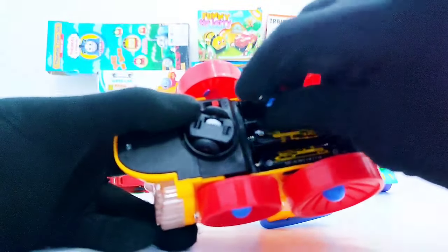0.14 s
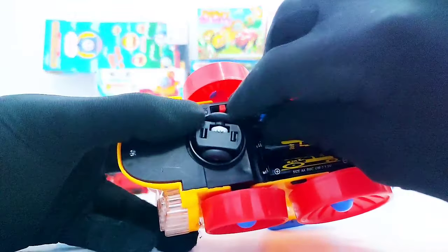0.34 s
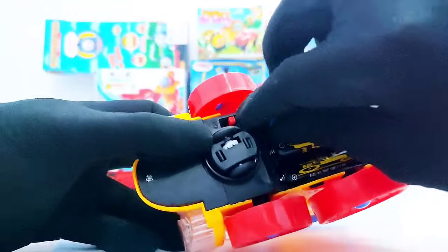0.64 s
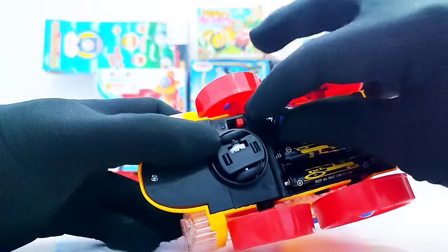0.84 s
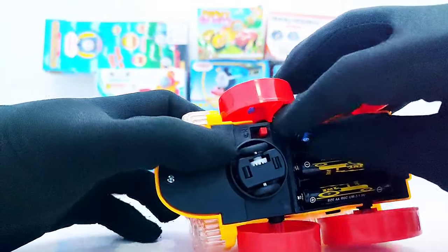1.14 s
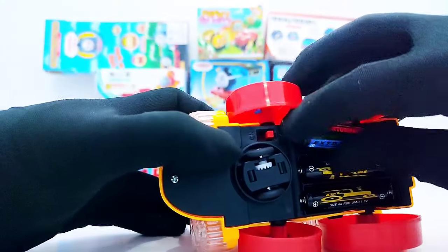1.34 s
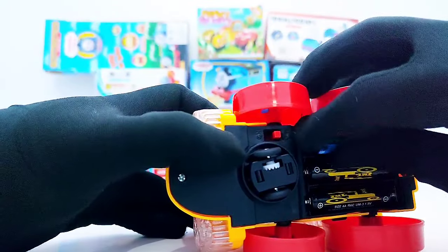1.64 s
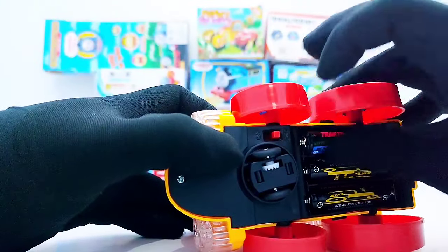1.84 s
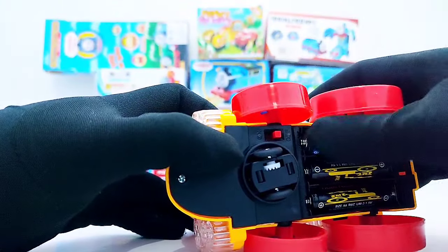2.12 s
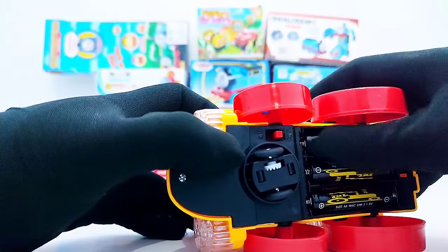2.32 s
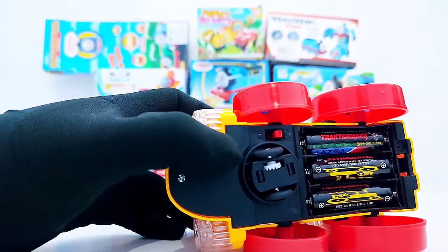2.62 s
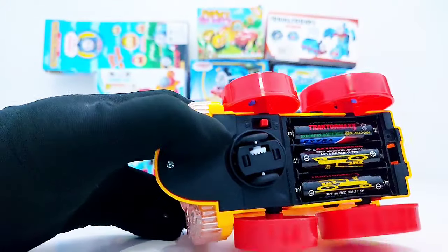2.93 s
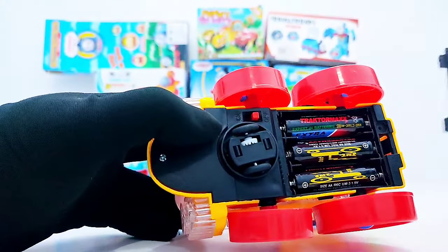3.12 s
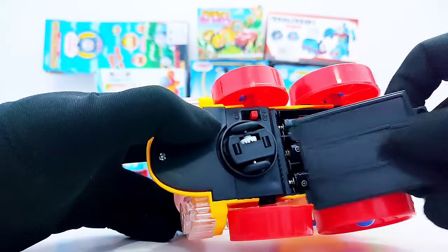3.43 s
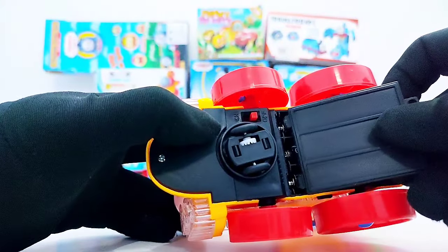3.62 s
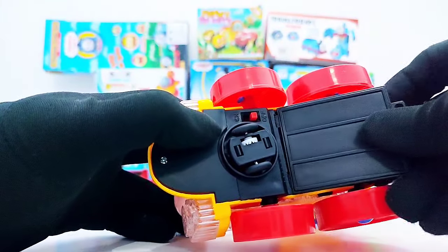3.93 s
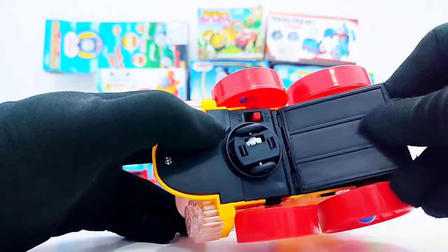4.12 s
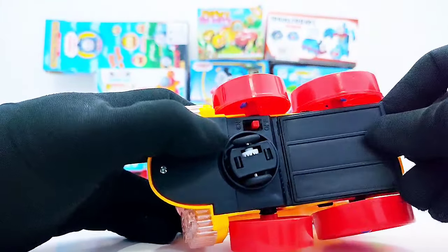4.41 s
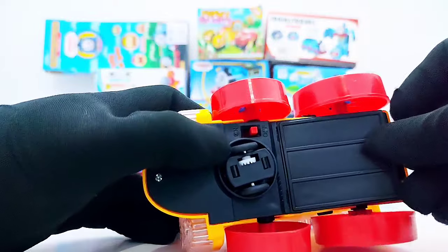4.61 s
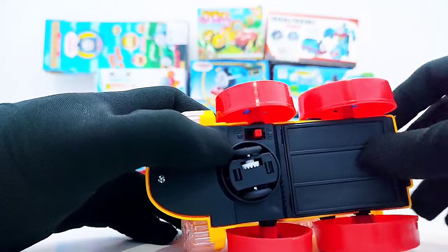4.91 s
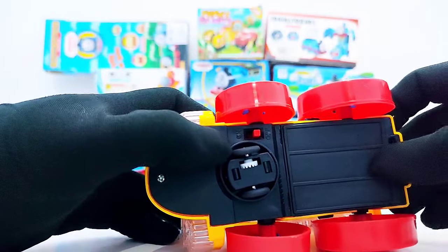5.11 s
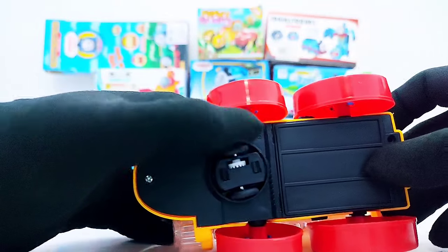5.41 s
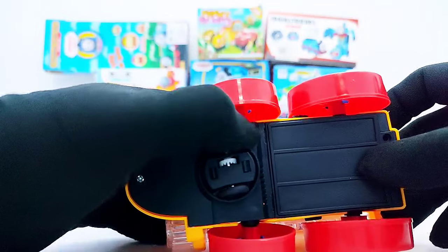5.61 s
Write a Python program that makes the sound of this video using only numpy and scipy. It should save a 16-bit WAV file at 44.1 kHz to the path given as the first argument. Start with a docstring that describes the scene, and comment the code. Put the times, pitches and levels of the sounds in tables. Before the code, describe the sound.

A close, dry stereo pickup of a hollow plastic toy handled by gloved hands in a small room, over faint room air and a low steady mains hum. A soft low bump and a light click open it; at 0.7 s a tight cluster of clacks knocks the shell, with a slight table boom and rattle. Quiet glove rubbing follows, then moderate clicks at 1.6-1.9 s. Around 2.2 s ticks build to the hardest battery snap at 2.27 s, bright and hollow, with a short boom and loose rattle. Smaller clicks follow at 2.5 and 2.8 s. It calms until the cover touches lightly at 3.5 s; dull hand bumps rumble, mostly on the right, around 3.7-4.1 s. A brief gritty scrape comes at 4.15 s, a click at 4.3, small ticks from 4.7, then a loud latch snap, brighter on the left, at 5.15 s. A faint tick, pat and soft thumb rub end it.

```python
"""Closing a toy train's battery cover

Gloved hands press a battery into a hollow plastic toy train, then slide its cover on and snap it shut.
Each contact scuffs and briefly rings the shell; fingertips pat it, and the latch rings the cover.
Gloves, cover and thumb rub as grainy noise; hard pushes boom the table and set loose parts rattling.
Hands bump and rumble the microphone. A small room answers the plastic, over room air and a mains hum."""
import sys
import numpy as np
from scipy import signal
from scipy.fft import rfft, irfft, next_fast_len
from scipy.io import wavfile
from scipy.ndimage import uniform_filter1d

SR = 44100
rng = np.random.default_rng(int(sys.argv[2]) if len(sys.argv) > 2 else 0)


def wrap_up_sound(samples):
    """Save the sound to the file named by the first command line argument, as 16-bit audio."""
    columns = np.atleast_2d(samples).T
    # keep every value between -1 and 1, then stretch to whole-number steps
    tamed = np.clip(columns, -1, 1)
    steps = np.round(tamed * 32767).astype(np.int16)
    wavfile.write(sys.argv[1], SR, steps)


N = 253737
TIME = np.arange(N) / SR

# plastic contacts, from battery to cover: (time [s], level [dB], pitch the struck spot favours [Hz],
# hardness [dB per octave], treble left over right [dB], held within 10 either way)
CLICKS = [(.2153, -37, 2220, -1, -7), (0.7192, -30, 920, 2.5, 10), (0.7218, -23.3, 1540, -3, -13),
          (.731, -32.5, 2090, -2.5, -13), (.743, -41.5, 1400, -2, -6), (0.9213, -44, 4060, -2, 0),
          (1.479, -53, 900, 3.5, 0), (1.507, -54, 800, 3, 0), (1.6038, -30.5, 2050, 1, 0),
          (1.621, -35.5, 1700, -3, -8), (1.6489, -31, 1650, 0, -4), (1.7609, -26.5, 1400, 3.5, 0),
          (1.8888, -34.5, 980, -1, 2), (2.04, -47.5, 895, 4, 0), (2.136, -42.5, 1610, -6.5, 0),
          (2.1877, -40.5, 1900, -2.5, -6), (2.209, -44, 3200, 0, 5), (2.2465, -38.5, 1690, -8.5, 10),
          (2.271, -22.5, 900, 3, -7.5), (2.2728, -12, 1200, 2.2, -5), (2.442, -41.5, 1280, 0.5, -3),
          (2.4765, -33, 960, -1, -10), (2.48, -38.5, 3200, 4, 1), (2.516, -32, 1020, 0.5, -5),
          (2.789, -50, 3200, 5, -11), (2.8095, -34, 4360, 1.5, -14), (2.822, -42.5, 2825, 8.5, -14),
          (3.5383, -37, 1390, -3, 1), (3.5439, -36.5, 1340, -4, 12), (3.638, -48, 900, -0.5, -2),
          (3.8088, -47.5, 823, -4.5, 4), (3.984, -56.5, 1820, 5.5, -3.5), (4.3237, -31, 1620, -2, 0),
          (4.7042, -38, 900, -1, -1.5), (4.708, -33, 4340, -1.2, 0.5), (4.725, -41, 1680, -0.5, -3),
          (4.829, -49, 700, 3.5, -8), (4.905, -43, 2040, 0, -1), (4.92, -41, 960, -8, 4.5),
          (5.027, -47, 810, 1.5, -1), (5.076, -45, 2300, -3, -1), (5.151, -28, 1750, -1.5, 8),
          (5.428, -46, 2460, -3.5, 3)]
# gloved fingertips patting the shell as they find their hold: (time [s], level [dB])
PATS = [(.077, -50.5), (1.149, -52), (1.3283, -48), (3.451, -52), (4.446, -51), (4.758, -49),
        (5.5592, -48.5)]
# the toy's weight landing on the table: (time [s], level [dB])
KNOCKS = [(0.722, -21.5), (2.274, -29), (2.808, -28.5)]
# edges of the shell's hollow, knock, clack, snap and tick registers: (frequency [Hz])
REGISTER_HZ = [450, 750, 1150, 1800, 3200, 14000]

FAVOUR_DB, FAVOUR_OCTAVES = 11.5, 0.41  # how much, and how widely, the struck spot lifts its own pitch
CHATTER_S = .001  # time constant of a contact's chatter
LEAD_S = .005  # quiet ahead of each contact
CONTACT_TIME = np.arange(2048) / SR - LEAD_S
CONTACT_HZ = np.fft.rfftfreq(len(CONTACT_TIME), 1 / SR)
HISS_TOP_HZ = 14400  # upper edge of rubbing, rumble and room air
RELEASE_S = .07  # time for a rub to fall 60 dB once the hand lets go


def amp(db):
    """Turns decibels into gain."""
    return 10 ** (np.asarray(db) / 20)


def evened(x):
    """Scales to an rms of one."""
    return x / np.sqrt(np.mean(x ** 2) + 1e-20)


def read(points, hz, column=1):
    """Reads between a table's points on a log-frequency axis."""
    columns = np.transpose(points)
    return np.interp(np.log(hz + 1), np.log(columns[0] + 1), columns[column])


def sides(db):
    """Left and right gains for a level difference; a negative one favours the right."""
    return evened(amp([[db / 2], [-db / 2]]))


def add(mix, s, sound):
    """Mixes a sound in at time s, cutting it off at the end."""
    part = mix[:, max(round(s * SR), 0):][:, :sound.shape[1]]
    part += sound[:, :part.shape[1]]


def colour(x, tone):
    """Gives a sound a spectrum, at an rms of one."""
    size = next_fast_len(N)
    hz = np.fft.rfftfreq(size, 1 / SR)
    gain = amp(read(tone, hz)) * (hz < HISS_TOP_HZ)
    return evened(irfft(rfft(x, size) * gain, size)[..., :N])


def noise(size, alike):
    """Two channels of white noise that are partly the same."""
    left, other = rng.standard_normal((2, size))
    alike = np.clip(alike, 0, 1)
    return np.array([left, alike * left + np.sqrt(1 - alike ** 2) * other])


def background():
    """Still room air as shaped noise, and the mains hum as one sine."""
    # room air: (frequency [Hz], relative level per Hz [dB])
    air_tone = [(130, -6), (220, -10), (380, -6), (1200, -21), (2400, -31.5), (8000, -46.5), (14000, -38)]
    hum_hz, hum_db = 100.4, -48.5  # dB rms
    hum = amp(hum_db) * np.sqrt(2) * np.sin(2 * np.pi * hum_hz * TIME)
    return hum + amp(-56.0) * colour(noise(N, 0.85), air_tone)


def handling(bump_cycles=0.24):
    """Dead bumps of the moving hands and the low rumble that grows around them, mostly on the right."""
    # soft bumps of the hands: (time [s], peak level before panning [dB], pitch [Hz])
    hand_bumps = [(0.072, -19.5, 64.4), (1.258, -23, 53), (1.708, -20.5, 71), (2.654, -26.5, 52),
                  (3.681, -20, 66.5), (3.731, -27, 146), (3.836, -21.5, 45.7), (4.133, -26, 57.8)]
    # rumble: (frequency [Hz], relative level per Hz [dB])
    rumble_tone = [(60, 6), (160, -15), (4000, -80)]
    # rumble at rest; added rumble against each bump; its time constant before and after the bump
    steady_db, unrest_db, unrest_s = -48.5, -15, 0.23
    unrest = 0
    for s, db, hz in hand_bumps:
        fade_db = 20 * np.log10(np.e) * abs(TIME - s) / unrest_s
        unrest = unrest + amp(db + unrest_db - fade_db) ** 2
    rumble = colour(noise(N, 0.47), rumble_tone)
    out = rumble * np.sqrt(amp(steady_db) ** 2 + unrest) * sides(-7.0)
    t = np.arange(SR // 4) / SR
    for s, db, hz in hand_bumps:
        swell = hz * t / bump_cycles
        envelope = swell ** 2 * np.exp(2 - 2 * swell)  # peaks at one when swell is one
        add(out, s, amp(db) * envelope * np.sin(2 * np.pi * hz * t) * sides(-34.0))
    return out


def rub(gain, tone, slip_db, slips_per_s=300, grain_db=2.2, flutter_db=3.0):
    """Friction: a fine hiss with many tiny slips of uneven size, catching and letting go."""
    slip_starts = rng.random(N) < slips_per_s / SR
    slip_size = amp(grain_db * np.minimum(rng.exponential(1, N), 4))
    slips = slip_starts * slip_size * noise(N, 0.17)
    # smoothed noise makes the level wander
    catch = evened(uniform_filter1d(uniform_filter1d(rng.standard_normal(N), size=500), size=500))
    grit = noise(N, 0.06) + amp(slip_db) * evened(slips)
    return colour(grit, tone) * gain * amp(flutter_db * catch)


def stroke(rows, swell_db):
    """Gain of a series of rubs: each swells while the hand pushes and dies when it lets go."""
    gain = np.zeros(N)
    for start, length, db in rows:
        progress = np.clip((TIME - start) / length, 0, 1)
        released_s = np.maximum(TIME - start - length, 0)
        gain += progress * amp(db - swell_db * (1 - progress) ** 2 - 60 * released_s / RELEASE_S)
    return gain


def gloves():
    """Gloves stroke the plastic as grainy noise, over a faint rustle while they only hold the toy."""
    # strokes: (start [s], length [s], level at the end of the push [dB])
    glove_strokes = [(.65, 0.044, -48.5), (1.17, .25, -61), (1.62, .6, -57), (2.35, .24, -49.5),
                     (2.76, 0.19, -50.5), (4.125, 0.042, -45), (4.72, 0.38, -55.5)]
    # rubbing gloves: (frequency [Hz], relative level per Hz [dB])
    glove_tone = [(300, -1), (1000, 2.5), (2500, -3.5), (5300, -8), (7300, -7), (9500, -16.5),
                  (12500, -12.5)]
    grip_db = -64.5
    gain = amp(grip_db) + stroke(glove_strokes, swell_db=0)
    return rub(gain, glove_tone, slips_per_s=95, slip_db=-10.5) * sides(-1.8)


def scuffs():
    """Parts scrape along each other just before and after they touch: brief gritty friction."""
    # scuffing plastic: (frequency [Hz], relative level per Hz [dB])
    scuff_tone = [(400, -3), (1000, 4), (2200, -1.5), (4000, -10.5), (15000, -32)]
    # level against the contact; the highest level set; time to fall 60 dB either side
    scuff_db, max_db, scuff_s = -6, -48, 0.047
    coarse_time = TIME[::64]
    gain = 0
    for s, db, *_ in CLICKS + PATS:
        gain = gain + amp(min(db + scuff_db, max_db) - 60 * abs(coarse_time - s) / scuff_s)
    gain = np.interp(TIME, coarse_time, gain)
    return rub(gain, scuff_tone, slips_per_s=830, slip_db=7.5) * sides(-2)


def registers(db, spot_hz, hardness_db):
    """Shares a level among the shell's registers: harder is brighter, and the spot favours one pitch."""
    edges = np.log2(REGISTER_HZ)
    octaves = (edges[1:] + edges[:-1]) / 2 - np.log2(spot_hz)
    shape_db = hardness_db * octaves + FAVOUR_DB * np.exp(-(octaves / FAVOUR_OCTAVES) ** 2 / 2)
    return db + shape_db - 20 * np.log10(np.linalg.norm(amp(shape_db)))


def causal(gain):
    """Gives a gain curve the phase of a real resonator, so that nothing sounds before the blow."""
    cepstrum = irfft(np.log(gain + 1e-9))
    size = cepstrum.shape[-1]
    # move the half that lies before time zero to after it
    fold = 1 + np.sign(size / 2 - np.arange(size)) * (np.arange(size) > 0)
    return np.exp(rfft(cepstrum * fold))


def ten_ms_db(z):
    """Level of a contact's spectrum, as if it lasted ten milliseconds."""
    return 10 * np.log10(np.sum(abs(z) ** 2) / len(CONTACT_TIME) / (SR / 100))


def struck(modes, detune, neighbour_sign, crack=0, channel_spread=1.2):
    """Two-channel spectrum of a struck plastic part: a short burst of chatter rings its modes."""
    t, hz = CONTACT_TIME, CONTACT_HZ
    # the surfaces touch many times in quick succession, which drives the modes
    chatter = rfft(rng.standard_normal(len(t)) * np.exp(-abs(t) / CHATTER_S) * (t > 0))
    chatter = chatter / causal(abs(chatter) ** .75)  # drives the modes more evenly
    body = crack * np.ones((2, len(hz)), complex)
    for k, (mode_hz, db, t60) in enumerate(modes):
        # the grip can shift each mode a little, and high modes reach the two channels out of step
        offset_hz = hz - mode_hz * (1 + detune * rng.standard_normal())
        turn = channel_spread * np.tanh(mode_hz / 3500) * rng.standard_normal() * np.array([[.5], [-.5]])
        resonance = 1 / (1 + 2j * np.pi * offset_hz * t60 / np.log(1000))
        body += neighbour_sign ** k * amp(db) * np.exp(1j * turn) * resonance
    # a small part radiates little below its first mode, and soft plastic little in the top treble
    below = REGISTER_HZ[0] / (1j * hz + 1)
    low_cut = (1 + below + below ** 2) * (1 + below)
    return chatter * body / low_cut / (1 + (hz / REGISTER_HZ[-1]) ** 20)


def radiate(z, treble_db, lag_s=.00002):
    """Turns a contact's spectrum into sound; only the treble is beamed to one side."""
    treble = np.clip(np.log2((CONTACT_HZ + 1) / REGISTER_HZ[2]), 0, 1)
    balance_db = np.clip(treble_db, -10, 10) * treble
    balance = amp(np.array([balance_db, -balance_db]) / 2)
    z = z * causal(balance / np.sqrt(np.mean(balance ** 2, axis=0)))
    left_lag_s = lag_s  # the left channel hears the contact a little later
    z[0] *= np.exp(-2j * np.pi * CONTACT_HZ * left_lag_s)
    return irfft(z) * signal.windows.tukey(len(CONTACT_TIME), 1 / 10)


def click(db, spot_hz, hardness_db, crack_db=-17, spot_lift_db=7):
    """Spectrum of one contact on the shell: where and how hard it lands sets each register."""
    # modes of the shell with its batteries: (frequency [Hz], relative level [dB], time to fall 60 dB [s])
    shell_modes = [(611, -9, 0.017), (842, 6, 0.024), (958, 5, 0.026), (1400, 5.5, 0.014),
                   (1363, 4, 0.0077), (1780, 0, 0.012), (2027, 5.5, 0.0097), (2853, 4.5, 0.012),
                   (3550, 4.5, 0.009), (4400, 4, 0.012), (5420, -3, 0.0082), (7150, 1, 0.0047),
                   (11270, -7, 0.0015)]
    hz, levels_db = CONTACT_HZ, registers(db, spot_hz, hardness_db)
    # a hard contact, with more tick than snap, reaches further up the treble than a soft one
    octaves_up = np.clip(np.log2((hz + 1) / REGISTER_HZ[-2]), 0, 2)
    reach_db = max(levels_db[-1] - levels_db[-2], -3) * octaves_up
    # within a register, the modes nearest the struck spot's pitch ring most
    lift_db = spot_lift_db * np.exp(-(np.log2((hz + 1) / spot_hz) / FAVOUR_OCTAVES) ** 2 / 2)
    z = struck(shell_modes, detune=.044, neighbour_sign=-0.99, crack=amp(crack_db))
    z = z * causal(amp(reach_db + lift_db))
    # bring each register to its level
    gains = []
    for lo, hi, level_db in zip(REGISTER_HZ, REGISTER_HZ[1:], levels_db):
        gain_db = level_db - ten_ms_db(z[:, (hz >= lo) & (hz < hi)])
        gains += [(lo * 1.1, gain_db), (hi / 1.1, gain_db)]
    return z * causal(amp(read(gains, hz)))


def clicks():
    """Battery, springs and cover knock on the shell and ring it; fingertips pat it more dully."""
    pat_hz, pat_hardness_db = 1150, -2  # the pitch pats favour; dB per octave
    out = np.zeros((2, N))
    for s, db in PATS:
        add(out, s - LEAD_S, radiate(click(db, pat_hz, pat_hardness_db), 0))
    for s, db, spot_hz, hardness_db, treble_db in CLICKS:
        add(out, s - LEAD_S, radiate(click(db, spot_hz, hardness_db), treble_db))
    return out


def table():
    """Hard pushes pass through the wheels and make the table boom: a sum of dying sines."""
    # modes of the table top: (frequency [Hz], level against the knock [dB], time to fall 60 dB [s])
    table_modes = [(87.4, -10, 0.8), (113.3, -8.5, 0.47), (132, -6.5, 0.31), (187.8, -18, 0.51)]
    out, t = np.zeros((2, N)), np.arange(SR) / SR
    boom = sum(amp(db - 60 * t / t60) * np.sin(2 * np.pi * hz * t) for hz, db, t60 in table_modes)
    for s, db in KNOCKS:
        add(out, s, amp(db) * boom * sides(-1.5))
    return out


def rattle(t60=0.27):
    """Loose wheels and gears chatter on after each hard push, as dense grainy noise that dies away."""
    # rattling parts: (frequency [Hz], relative level per Hz [dB])
    rattle_tone = [(120, -7.5), (300, 4.5), (2400, -6), (5000, -13.5), (15000, -56.5)]
    shaking = sum(amp(db - 60 * abs(TIME - s) / t60) * (TIME > s) for s, db in KNOCKS)
    return amp(-13) * rub(shaking, rattle_tone, slips_per_s=900, slip_db=3)


def cover():
    """Pushes scrape the cover's edge along its seat, as friction that swells with each push."""
    # pushes: (start [s], length [s], level at the end of the push [dB])
    cover_pushes = [(3.73, 0.062, -56), (3.85, 0.47, -54), (4.135, 0.068, -35), (4.63, .04, -54),
                    (4.83, 0.066, -53)]
    # scraping cover: (frequency [Hz], relative level per Hz [dB])
    cover_tone = [(400, -22), (1650, -6), (1980, 15), (2200, 6), (2620, 4.5), (3250, -12), (4400, -5.5),
                  (12000, -31)]
    return rub(stroke(cover_pushes, swell_db=3.5), cover_tone, slip_db=2)


def latch(soft_hz=3800):
    """The latch springs over its catch and rings the seated cover, softened in the treble."""
    # the latch snapping home: (time [s], level [dB], treble left over right [dB])
    latch_snap = (5.1535, -11.8, 10)
    # modes of the seated cover: (frequency [Hz], relative level [dB], time to fall 60 dB [s])
    cover_modes = [(690, 0, 0.042), (834, -1.5, .018), (1550, 1.5, 0.011), (2090, 5.5, 0.009),
                   (2790, -7, 0.016), (3350, -10.5, .008), (5300, -16, 0.003), (6450, -13, 0.0075)]
    out, (s, db, treble_db) = np.zeros((2, N)), latch_snap
    z = struck(cover_modes, detune=0, neighbour_sign=1)
    z = z / (1 + 1j * CONTACT_HZ / soft_hz)
    add(out, s - LEAD_S, radiate(z * amp(db - ten_ms_db(z)), treble_db))
    return out


def thumb():
    """The thumb shifts its hold on the shell: one soft stroke of friction."""
    # strokes: (start [s], length [s], level at the end of the push [dB])
    thumb_strokes = [(5.64, 0.091, -53.5)]
    # rubbing thumb: (frequency [Hz], relative level per Hz [dB])
    thumb_tone = [(500, -24), (950, -1.5), (1300, -0.5), (1800, -16), (6000, -32)]
    return rub(stroke(thumb_strokes, swell_db=-3.5), thumb_tone, slip_db=-11.0)


def room(x, build_s=0.007):
    """Sparse reflections of random sign, each band dying at its own speed."""
    # the room: (frequency [Hz], time to fall 60 dB [s], relative level [dB])
    room_bands = [(200, 0.75, 5.5), (680, 0.45, 5.5), (1965, 0.62, -5), (7200, 0.45, 2),
                  (14000, 0.43, -0.5)]
    taps = rng.choice([-1., 1.], (2, SR)) * (rng.random((2, SR)) < .15)
    hz, t, z = signal.stft(taps, SR, nperseg=256)
    fade_db = read(room_bands, hz, 2)[:, None] - 60 * t / read(room_bands, hz)[:, None]
    tail = signal.istft(z * amp(fade_db), SR, nperseg=256)[1]
    tail = tail * np.minimum(np.arange(tail.shape[1]) / SR / build_s, 1)  # builds up over build_s
    tail = tail / np.linalg.norm(tail[0])
    return signal.fftconvolve(x.mean(axis=0)[None], tail, axes=1)[:, :N]


def reflections(rubbing, count=6, latch_db=1.5):
    """The toy throws a different mix of its modes at each wall, so together the reflections sound even."""
    walls = sum(room(clicks() + amp(latch_db) * latch() + rubbing) for _ in range(count))
    return walls / count ** .5


def scene():
    """The toy close to the microphone, in a small quiet room."""
    rubbing = gloves() + scuffs() + rattle() + cover() + thumb()
    toy = clicks() + latch() + rubbing
    return toy + amp(-13.4) * reflections(rubbing) + table() + handling() + background()


def record(dry):
    """Clips at full scale, then takes away the highest treble."""
    edge_hz = 16200
    low_pass = signal.firwin(511, edge_hz, window=("kaiser", 9), fs=SR)
    return signal.oaconvolve(np.clip(dry, -1, 1), low_pass[None], "same")


dry = scene()
out = record(dry)
wrap_up_sound(out)
```